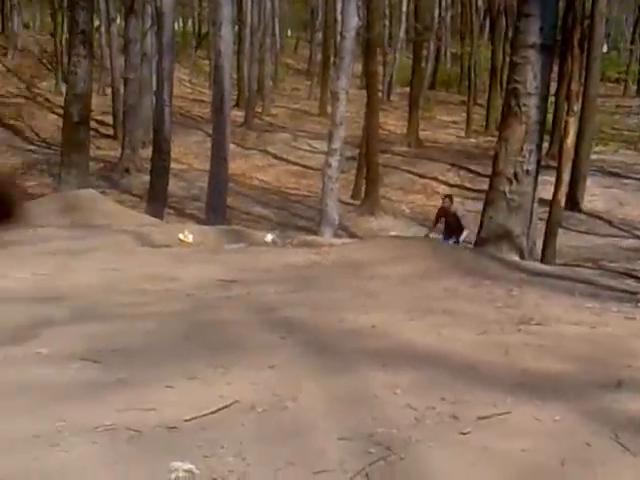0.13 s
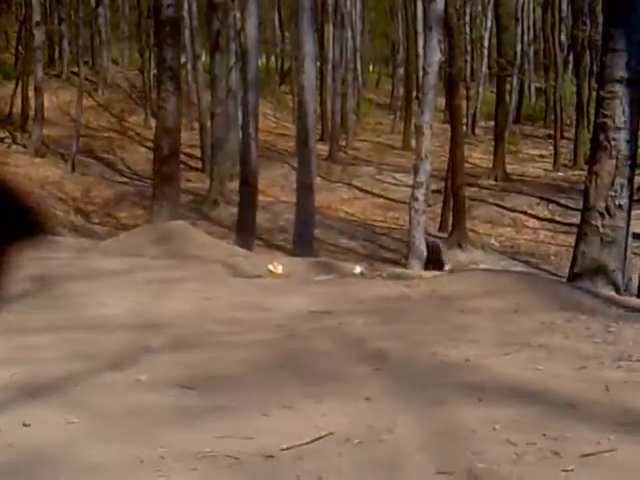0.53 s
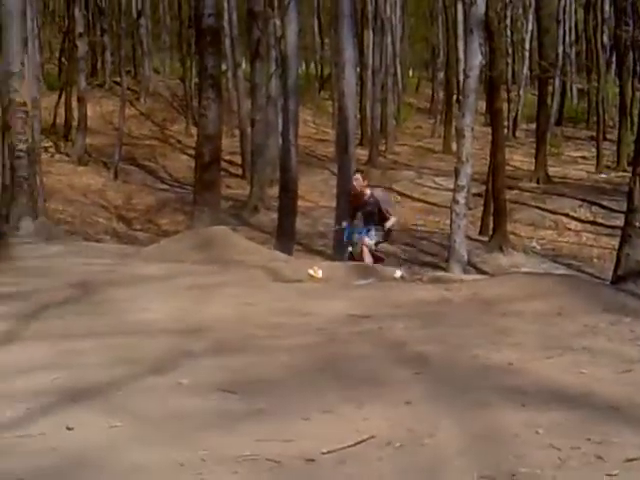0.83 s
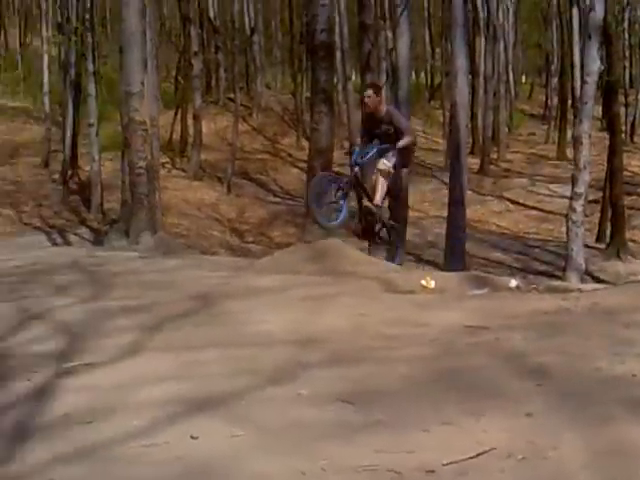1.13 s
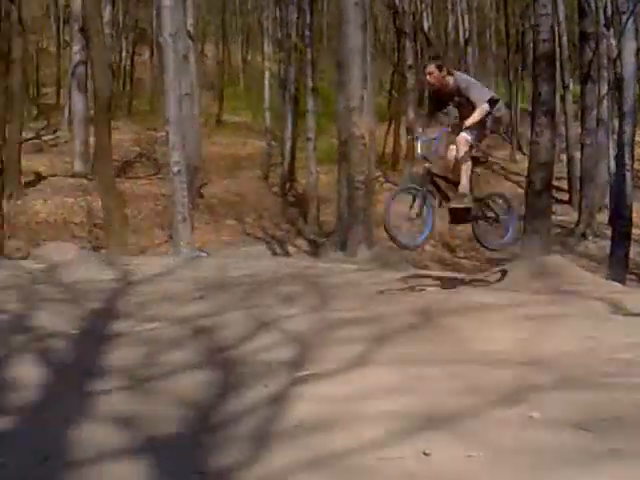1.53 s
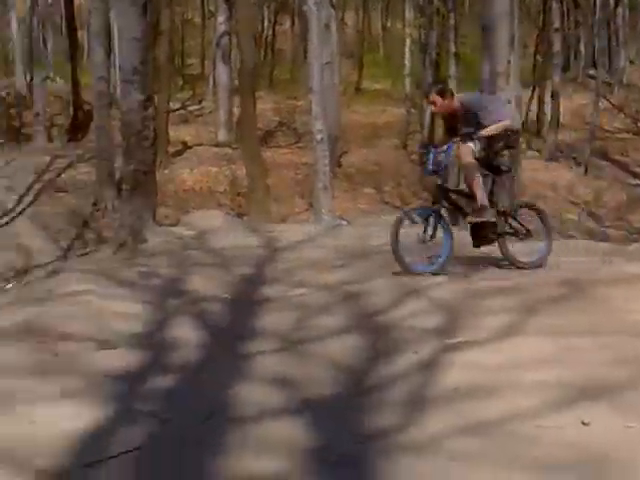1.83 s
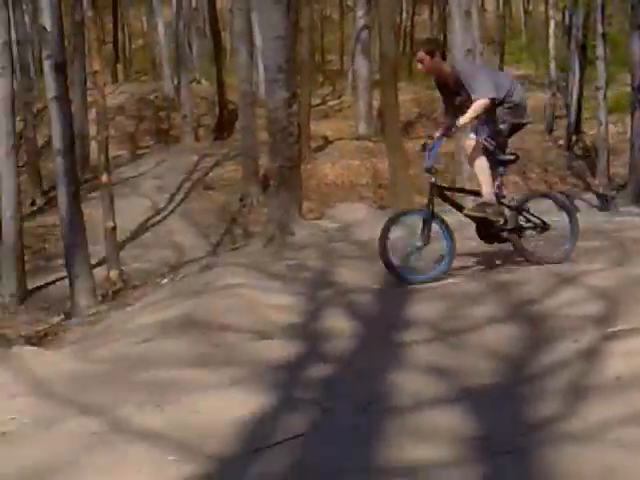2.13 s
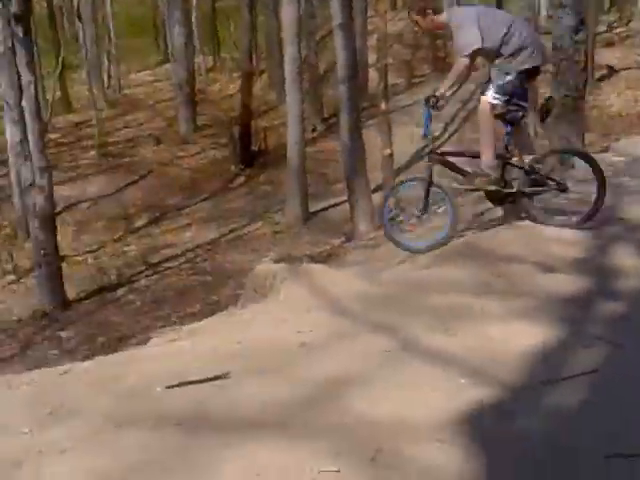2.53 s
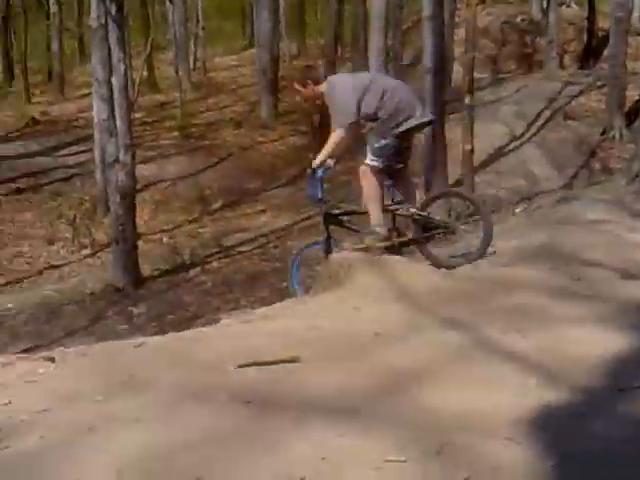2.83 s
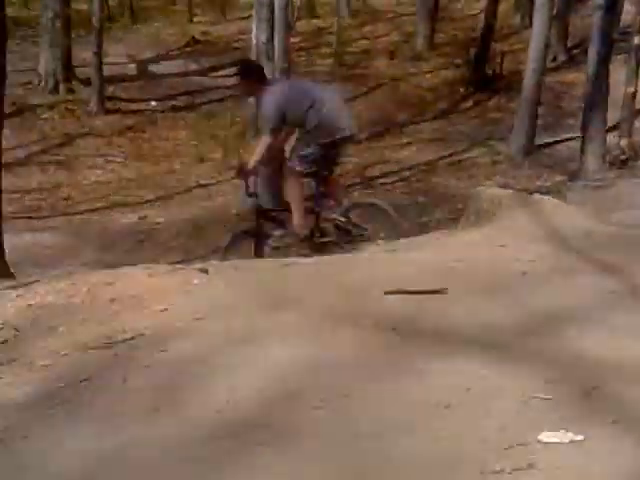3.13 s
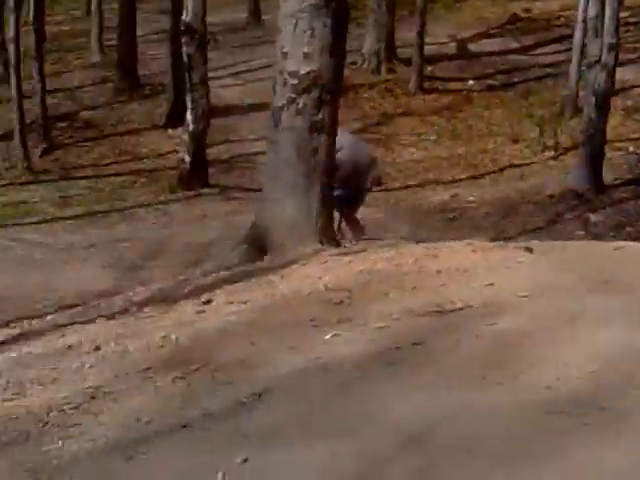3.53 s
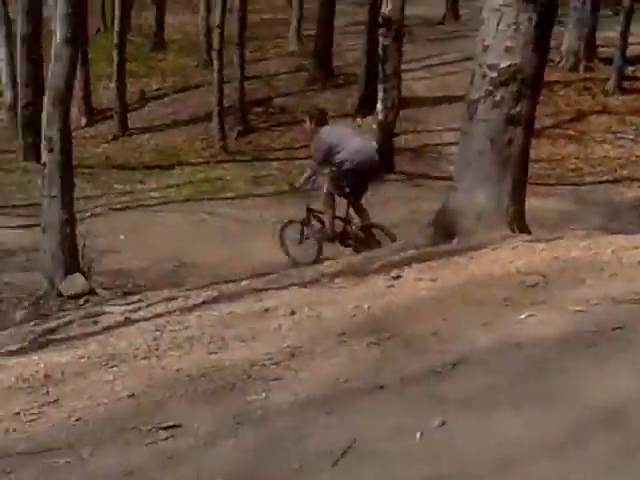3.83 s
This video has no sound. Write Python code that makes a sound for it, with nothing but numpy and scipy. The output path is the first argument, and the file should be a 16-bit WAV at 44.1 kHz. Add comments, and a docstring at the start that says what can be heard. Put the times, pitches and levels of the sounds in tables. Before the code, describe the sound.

A bicycle approaches faintly over packed dirt in quiet woods, with light chain clinks from about 1 second. At 1.8 seconds it lands with a dull thud of tyres and a metal clatter. It rolls on to the end, the tyres crunching softly and the chain slapping over bumps. Dry ticks sound at the microphone near 0.3 and 2.6 seconds, then a loud sharp click and soft bump at 3.9.

```python
"""Dirt jump in a wood

A small bicycle takes a jump, lands with a dull thud and rolls past a hand-held camera, away downhill.
The tyres boom and the frame clatters on landing; the chain slaps at each bump, over crunching dirt.
Trees scatter the sound back. Dry ticks and soft handling bumps sit right at the microphone."""
import sys
import numpy as np
from scipy import signal
from scipy.io import wavfile
from scipy.ndimage import uniform_filter1d

SR = 44100
rng = np.random.default_rng(int(sys.argv[2]) if len(sys.argv) > 2 else 0)


def to_wav(s):
    """Save 16-bit WAV."""
    ch = np.atleast_2d(s).T  # columns
    pcm = np.round(np.clip(ch, -1, 1) * 32767)  # PCM
    wavfile.write(sys.argv[1], SR, pcm.astype(np.int16))


N = 176400
TIME = np.arange(N) / SR

# blows of the landing: start_s, frame_db, chain_db, tyre_db, thud_db
LANDING_BLOWS = [(1.8226, -41, -77, -55, -40.5), (1.834, -36.5, -48, -48, -42),
                 (1.8419, -33.5, -69, -39, -32.5), (1.85, -38.5, -68, -43.5, -56),
                 (1.856, -31, -68, -35, -52), (1.866, -37.5, -70, -43, -59), (1.879, -42.5, -68, -58, -62),
                 (1.892, -42.5, -61, -45, -60)]
# chain slaps and rattles: start_s, length_s, frame_db, chain_db, clink_hz, clink_db
CHAIN_SLAPS = [(1.047, 0.005, -61, -64, 2800, -62), (1.195, 0.02, -58, -63.5, 3400, -65),
               (1.241, 0.029, -62.5, -77, 2100, -60.5), (1.279, 0.011, -45.5, -55, 2885, -47),
               (1.303, 0.039, -60, -71, 2210, -63), (1.356, 0.017, -57, -64.5, 2120, -60),
               (1.885, 0.006, -56, -70, 3600, -49), (1.891, 0.013, -65, -72, 4470, -49),
               (1.915, 0.0088, -51, -61, 2190, -41.5), (1.953, 0.0058, -43, -74, 2350, -58),
               (1.976, 0.0087, -47.5, -57, 1710, -52), (1.992, 0.0031, -64, -54, 6400, -60),
               (2.009, 0.0086, -47.5, -50, 2980, -46), (2.036, 0.004, -49, -47, 4400, -43.5),
               (2.054, 0.02, -55, -58.5, 2210, -64), (2.124, 0.016, -53.5, -58, 3100, -60),
               (2.151, 0.022, -58, -61.5, 9950, -68), (2.227, 0.015, -52.5, -61, 2180, -58),
               (2.296, 0.012, -50, -59, 1750, -62), (2.413, 0.024, -54.5, -55.5, 1840, -51),
               (2.44, 0.0087, -51, -60, 2020, -51), (2.537, 0.0066, -51, -79, 1730, -55),
               (2.568, 0.018, -48, -49.5, 1990, -50.5), (2.597, 0.021, -55, -52, 4230, -51),
               (2.632, 0.017, -53, -66, 3600, -54.5), (2.681, 0.0043, -53, -53, 6200, -45),
               (2.687, 0.0074, -42.5, -43, 10500, -62), (2.718, 0.021, -54.5, -58, 4930, -63),
               (3.016, 0.0029, -62, -78, 1770, -53.5), (3.044, 0.0048, -52.5, -55.5, 3610, -58.5),
               (3.075, 0.023, -60.5, -64, 2780, -65.5), (3.161, 0.0081, -47, -48, 6460, -51),
               (3.194, 0.011, -70, -63, 1870, -58), (3.23, 0.01, -57, -69, 2190, -55),
               (3.309, 0.01, -49, -52.5, 3055, -43.5), (3.387, 0.021, -59, -55.5, 3170, -53.5),
               (3.469, 0.02, -53, -59.5, 2970, -52.5), (3.525, 0.015, -59, -62.5, 3220, -56.5),
               (3.648, 0.026, -66, -62, 3140, -60), (3.775, 0.0073, -62, -52.5, 3320, -56),
               (3.861, 0.017, -52.5, -48, 5440, -52), (3.89, 0.016, -59, -52, 4760, -55),
               (3.915, 0.015, -54, -66, 2440, -66), (3.936, 0.011, -42.5, -43, 4630, -56),
               (3.984, 0.01, -57, -54, 2170, -56)]
# thin jingle of the links, far down the slope: start_s, level_db
LINK_JINGLES = [(3.775, -66), (3.862, -62), (3.958, -57), (3.987, -56)]
# partials of one clink: pitch_ratio, relative_db, t60_s
CLINK_PARTIALS = [(.94, -10, .02), (1, 9, 0.028), (1.05, -11, 0.022)]
# dirt thrown up by each tyre: start_s, level_db, decay_s
DIRT_SPRAYS = [(1.833, -44, 0.012), (1.852, -46, .06)]
# tyres on packed dirt and loose grit: time_s, crunch_db, grit_db
ROLL_LEVELS = [(0, -72, -77.5), (.4, -71, -79), (.56, -65, -85), (.95, -65.5, -74), (1.15, -67.5, -73),
               (1.27, -60, -73), (1.42, -62.5, -69.5), (1.58, -68, -74), (1.81, -67, -94),
               (1.87, -54.5, -56.5), (2.1, -62, -64), (2.35, -58.5, -67.5), (2.62, -59.5, -59.5),
               (2.8, -63.5, -64), (2.98, -66, -74), (3.201, -60, -60), (3.5, -54.5, -65), (3.74, -65, -63),
               (3.85, -62.5, -57), (4, -60, -50.5)]
# hum of the tread on the run-up: time_s, pitch_hz, level_db
TREAD_HUM = [(.88, 1050, -83), (.925, 1090, -68), (.98, 1135, -70.5), (1.05, 1160, -70), (1.11, 1156, -66),
             (1.16, 1145, -79.5), (1.22, 1153, -64.5), (1.31, 1135, -73)]
# dry ticks at the camera: start_s, peak_db, pitch_hz, width_hz
CAMERA_TICKS = [(0.3275, -31, 900, 6350), (1.0086, -41, 2600, 3500), (1.096, -44, 1800, 3000),
                (1.48, -48.5, 5000, 2000), (2.281, -31, 3040, 1400), (2.6065, -20, 3460, 910),
                (2.6064, -34.5, 8600, 2000), (3.921, -35, 5500, 4000), (3.9394, -3, 5270, 2400),
                (3.9777, -18.5, 3600, 1100), (3.9775, -25.5, 9100, 1800), (3.978, -28.5, 2080, 400),
                (3.988, -29.5, 990, 600)]
# soft handling bumps: start_s, level_db, decay_s
HANDLING_BUMPS = [(.326, -49.5, 0.031), (1.199, -58, 0.13), (1.642, -53.5, 0.095), (2.561, -57.5, 0.17),
                  (3.86, -53.5, 0.29), (3.927, -37.5, 0.062), (3.958, -50, 0.047)]
# decay among the trees: frequency_hz, t60_s
WOOD_DECAY = [(100, 0.33), (500, 0.36), (2000, 0.46), (5500, 0.22), (12000, 0.28)]

# resonances of the bicycle: pitch_hz, relative_db, t60_s
TYRE_RING = [(104, -13, 0.11), (160, -16, 0.15), (233, -10.5, 0.12), (269, -5.5, 0.11), (318, -2, 0.093),
             (365, 8, 0.22), (406, -18, .1), (625, -8, .07), (667, -2, 0.054), (790, -7, 0.07),
             (1010, -3.5, 0.063), (1140, -6, 0.063)]  # air and casing
FRAME_RING = [(1793, -3, .07), (1843, -7, .11), (2065, -5, .13), (2065, 2, .14), (2220, -7, .11),
              (2245, 1.5, .15), (2810, -7, .04), (2800, -4, .07), (3020, -8, .05), (3440, -10, .05),
              (4100, -4, .05), (4440, -5, .045), (4680, -7, .04)]  # frame, fork and rims
CHAIN_RING = [(3440, -1, 0.087), (3750, -14, 0.088), (4250, 1, 0.072), (4620, 9, .06), (4930, 4, 0.088),
              (5420, 6.5, 0.082), (5800, 6, .06), (6300, 0, 0.074), (6570, 6, 0.1), (7200, -8, 0.065),
              (8330, 3, 0.055), (9900, 1, 0.11), (12600, -4, 0.051), (13400, -7, .06)]  # chain and sprocket
CLASH_RING = [(2950, -11, .04), (4732, -3, .022), (4850, -7, .02), (5760, 8, .026), (6500, -16, .022)]  # chain hard against the frame
LINK_RING = [(12400, 3, .05), (13450, -7, .05)]

# spectra of the unpitched sounds: frequency_hz, relative_db
FRAME_CONTACT = [(100, -25), (400, -11), (900, -6.5), (1500, -6), (1800, 2.5), (2250, 2.5), (2550, -8.5),
                 (3100, -2.5), (3700, -15), (4500, -7), (5200, -36), (6600, -38), (7600, -43), (16000, -58)]
CHAIN_CONTACT = [(300, -10), (1500, -16), (3000, 0.5), (4600, 1.5), (6500, 0.5), (7500, -16), (10000, -12),
                 (11500, -23), (16000, -19)]
SPRAY_SPECTRUM = [(500, -14), (1500, -5), (2150, 8), (2700, -3), (4400, 3), (5200, -19), (7700, -35),
                  (10500, -16), (16000, -32)]
DIRT_SPECTRUM = [(60, 10), (150, 1), (280, -1), (480, -1.5), (700, -5), (1000, -2), (1350, 1), (2000, -4),
                 (2600, -8), (3500, -10.5), (5000, -15), (9000, -33), (16000, -24)]
GRIT_SPECTRUM = [(500, -21.5), (2000, -0.5), (3100, -2.5), (4000, -8), (6500, -7), (7600, -16.5),
                 (10000, -18), (16000, -25)]
STONE_SPECTRUM = [(800, -15), (2200, 0), (6300, -5), (7800, -13), (16000, -22)]
TICK_SPECTRUM = [(100, -31), (480, -10.5), (1100, -0.5), (3000, 4), (6400, 3), (8000, -1), (9500, -9.5),
                 (16000, -17)]
BUMP_SPECTRUM = [(15, 2.5), (35, -9), (65, 6), (120, -7.5), (250, -10.5), (600, -20), (2500, -23),
                 (6000, -32.5), (16000, -46)]
AIR_SPECTRUM = [(20, -4), (150, -15.5), (300, -14), (500, -18.5), (900, -15), (1400, -31.5), (2500, -26),
                (4200, -30.5), (7000, -30.5), (15500, -28.5)]
RUMBLE_SPECTRUM = [(15, -8), (35, -19), (60, 6.5), (80, 2.5), (130, -5), (250, -15), (800, -36),
                   (4000, -82)]

RISE_S = 0.0014  # attack of thud and spray


def landing(blow_s=0.0066, thud_hz=57, thud_decay_s=0.021):
    """The bicycle comes down in quick blows: each booms the tyres, thuds and shakes the metal."""
    out = np.zeros(N)
    for start, frame_db, chain_db, tyre_db, thud_db in LANDING_BLOWS:
        boom = struck(blow_s, TYRE_RING)
        t = np.arange(len(boom)) / SR
        thud = np.cos(2 * np.pi * thud_hz * t) * np.exp(-t / thud_decay_s) * np.minimum(t / RISE_S, 1)
        add(out, start, amp(tyre_db) * boom + amp(thud_db) * thud)
        add(out, start, frame_and_chain(blow_s, frame_db, chain_db))
    return out


def chain(clash_at_s=2.686, clash_length_s=0.0046, clash_db=-33.5):
    """The chain slaps and clinks over bumps, jingles far off and once hits the frame hard."""
    out = np.zeros(N)
    for start, length, frame_db, chain_db, clink_hz, clink_db in CHAIN_SLAPS:
        clink_modes = [(clink_hz * ratio, db, t60) for ratio, db, t60 in CLINK_PARTIALS]
        add(out, start, amp(clink_db) * struck(length, clink_modes))
        add(out, start, frame_and_chain(length, frame_db, chain_db))
    for start, db in LINK_JINGLES:
        add(out, start, amp(db) * struck(length_s=0.01, modes=LINK_RING))
    add(out, clash_at_s, amp(clash_db) * struck(clash_length_s, CLASH_RING))
    return out


def frame_and_chain(length_s, frame_db, chain_db):
    """One jolt sets both frame and chain clattering."""
    frame = amp(frame_db) * clatter(length_s, FRAME_CONTACT, FRAME_RING, ring_db=-3.5)
    return frame + amp(chain_db) * clatter(length_s, CHAIN_CONTACT, CHAIN_RING, ring_db=-7.5)


def clatter(length_s, spectrum, modes, ring_db):
    """Contacts on a metal part give an unpitched crack and a ring."""
    drive, strength = contacts(length_s)
    crack = signal.fftconvolve(drive, impulse(spectrum))[:len(drive)]
    out = crack / np.linalg.norm(crack) + amp(ring_db) * ring(drive, modes)
    return strength * out / np.linalg.norm(out)


def struck(length_s, modes):
    """The ring alone of a part under a flurry of contacts."""
    drive, strength = contacts(length_s)
    return strength * ring(drive, modes)


def contacts(length_s, per_s=7000, rise_share=0.18, sag_db=-4, fall_s=0.005):
    """Tiny impacts that swell, sag and stop; also returns the norm of their envelope."""
    t = np.arange(12000) / SR
    swell = np.minimum(t / (rise_share * length_s), 1)
    sag = amp(sag_db * (t / length_s - .5))
    envelope = swell * sag * np.exp(-np.maximum(t - length_s, 0) / fall_s)
    hits = rng.standard_normal(len(t)) * (rng.random(len(t)) < per_s / SR)
    return envelope * hits, np.linalg.norm(envelope)


def ring(drive, modes, detune=.007, scatter_db=2):
    """Damped modes, each blow favouring and detuning different ones; unit energy."""
    out = np.zeros(len(drive))
    for (hz, db, t60), (favour, shift) in zip(modes, rng.standard_normal((len(modes), 2))):
        pole = np.exp((2j * np.pi * hz * (1 + detune * shift) - np.log(1000) / t60) / SR)
        tone = signal.lfilter([1, -pole.real], [1, -2 * pole.real, abs(pole) ** 2], drive)
        out += amp(db + scatter_db * favour) * unit(tone)
    return out / np.linalg.norm(out)


def spray():
    """Fine dirt sprays from under the tyres at the landing."""
    level = np.zeros(N)
    for start, db, decay in DIRT_SPRAYS:
        age = TIME - start
        level += amp(db) * np.clip(age / RISE_S, 0, 1) * np.exp(-abs(age) / decay)
    return level * noise(SPRAY_SPECTRUM)


def rolling(uneven_db=1.32, fizz_db=-3.5, gravel_db=-3):
    """Tyres crunch over uneven packed dirt, fizzing grit and gravel."""
    times, crunch_db, grit_db = np.transpose(ROLL_LEVELS)
    ground = amp(uneven_db * wander(size=1100))
    grit = amp(fizz_db) * grains(GRIT_SPECTRUM) + amp(gravel_db) * gravel()
    crunch = amp(np.interp(TIME, times, crunch_db)) * grains(DIRT_SPECTRUM)
    return ground * (crunch + amp(np.interp(TIME, times, grit_db)) * grit)


def grains(spectrum, per_s=7000, spread_db=2.5):
    """Dense crushed grains of very uneven size."""
    sizes = amp(spread_db * np.minimum(rng.exponential(1, N), 5))
    return colour(sizes * rng.choice([-1, 1], N) * (rng.random(N) < per_s / SR), spectrum)


def gravel(per_s=80, spread_db=4, decay_s=.0018):
    """Loose stones crack under the tyres, each a very short burst of noise."""
    sizes = amp(spread_db * np.minimum(rng.exponential(1, N), 3))
    stones = sizes * (rng.random(N) < per_s / SR)
    level = signal.lfilter([1], [1, -np.exp(-1 / (decay_s * SR))], stones)
    return colour(level * rng.standard_normal(N), STONE_SPECTRUM)


def tread(waver=0.006, flutter=0.2):
    """The tread hums on the run-up, unsteady in pitch and level."""
    times, hz, db = np.transpose(TREAD_HUM)
    cycles = np.cumsum(np.interp(TIME, times, hz) * (1 + waver * wander(size=400))) / SR
    hum = unit((1 + flutter * wander(size=600)) * np.sin(2 * np.pi * cycles))
    return hum * amp(np.interp(TIME, times, db, left=-np.inf, right=-np.inf))


def trees(sound, level_db=-9.5, echoes_per_s=2000, build_s=0.0022):
    """Trunks scatter a thin, short tail of echoes back to the microphone."""
    t = np.arange(SR) / SR
    echoes = rng.standard_normal(SR) * (rng.random(SR) < echoes_per_s / SR) * np.minimum(t / build_s, 1)
    hz, delay, bands = signal.stft(echoes, SR, nperseg=256)
    decay = np.exp(-np.log(1000) * delay / read(WOOD_DECAY, hz)[:, None])
    tail = signal.istft(bands * decay, SR, nperseg=256)[1]
    return signal.fftconvolve(sound, amp(level_db) * tail / np.linalg.norm(tail))[:N]


def camera(bump_rise_s=0.00099):
    """Dry ticks and soft handling bumps, right at the microphone."""
    out, body = np.zeros(N), impulse(TICK_SPECTRUM)
    t = np.arange(SR // 40) / SR
    for start, db, hz, width in CAMERA_TICKS:
        ping = np.exp(-np.pi * width * t) * np.sin(2 * np.pi * hz * t)
        tick = signal.fftconvolve(ping, body)
        add(out, start, amp(db) * tick / abs(tick).max())
    t = np.arange(SR // 2) / SR
    for start, db, decay in HANDLING_BUMPS:
        envelope = np.minimum(t / bump_rise_s, 1) * np.exp(-t / decay)
        add(out, start, amp(db) * envelope * noise(BUMP_SPECTRUM, len(t)))
    return out


def air(air_db=-67, rumble_db=-70.5, rise_db_per_s=0.88):
    """Still woodland air, and a slowly growing rumble on the microphone."""
    hush = amp(air_db) * noise(AIR_SPECTRUM)
    return hush + amp(rumble_db + rise_db_per_s * TIME) * noise(RUMBLE_SPECTRUM)


def amp(db):
    """Decibels to gain."""
    return 10 ** (np.asarray(db) / 20)


def unit(x):
    """Scales to an rms of one."""
    return x / np.sqrt(np.mean(x ** 2) + 1e-30)


def read(points, hz):
    """Reads a curve on a log-frequency axis."""
    known_hz, value = np.transpose(points)
    return np.interp(np.log(hz + 1), np.log(known_hz + 1), value)


def add(mix, start_s, sound):
    """Mixes a sound in at a time."""
    part = mix[round(start_s * SR):][:len(sound)]
    part += sound[:len(part)]


def impulse(spectrum, size=4096):
    """Causal impulse of unit energy with the given spectrum."""
    log_gain = np.log(amp(read(spectrum, abs(np.fft.fftfreq(size, 1 / SR)))))
    response = np.fft.ifft(np.exp(np.conj(signal.hilbert(log_gain)))).real[:size // 2]
    return response / np.linalg.norm(response)


def colour(x, spectrum):
    """Gives a steady sound a spectrum and an rms of one."""
    return unit(signal.oaconvolve(x, impulse(spectrum))[:len(x)])


def noise(spectrum, size=N):
    """Coloured noise with an rms of one."""
    return colour(rng.standard_normal(size), spectrum)


def wander(size):
    """Random drift smoothed over size samples, with an rms of one."""
    return unit(uniform_filter1d(rng.standard_normal(N), size=size))


def scene():
    """The bicycle among the trees, in mono from where the camera stands."""
    bike = landing() + chain() + spray() + rolling() + tread()
    return (bike + trees(bike) + camera() + air())[None]


def record(dry, edge_hz=15950):
    """The recorder cuts off the highest treble."""
    lowpass = signal.firwin(511, edge_hz, window=("kaiser", 9), fs=SR)
    return signal.oaconvolve(dry, lowpass[None], "same")


dry = scene()
out = record(dry)
to_wav(out)
```